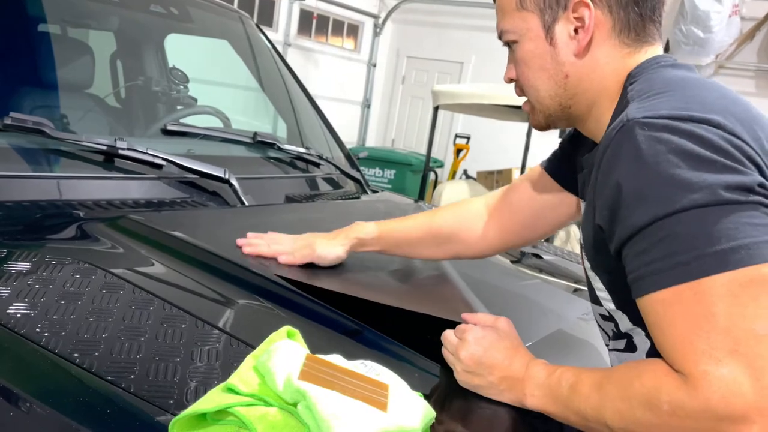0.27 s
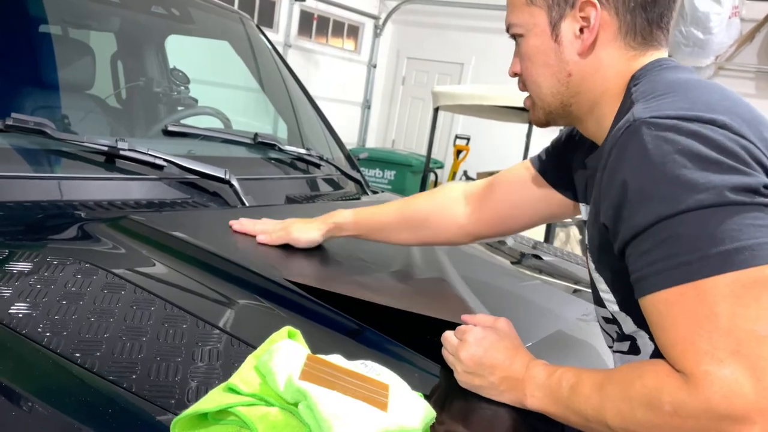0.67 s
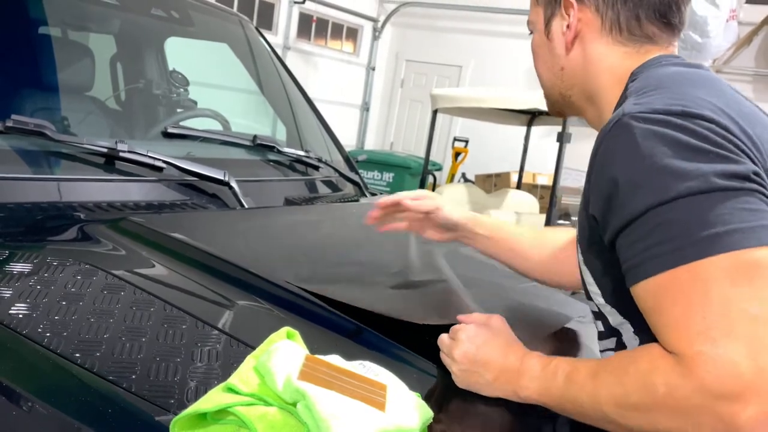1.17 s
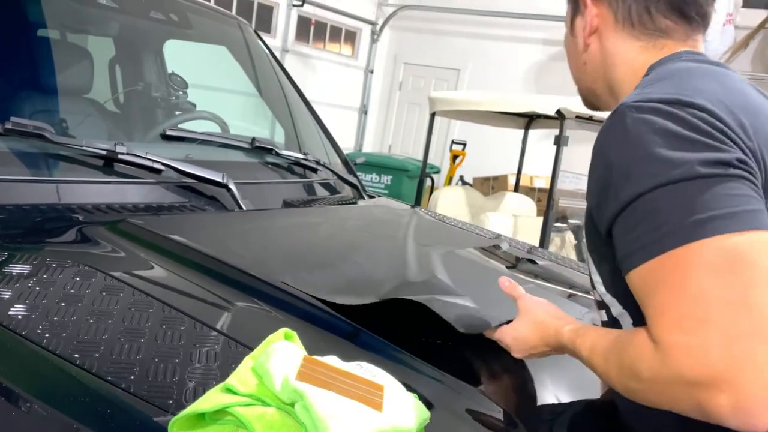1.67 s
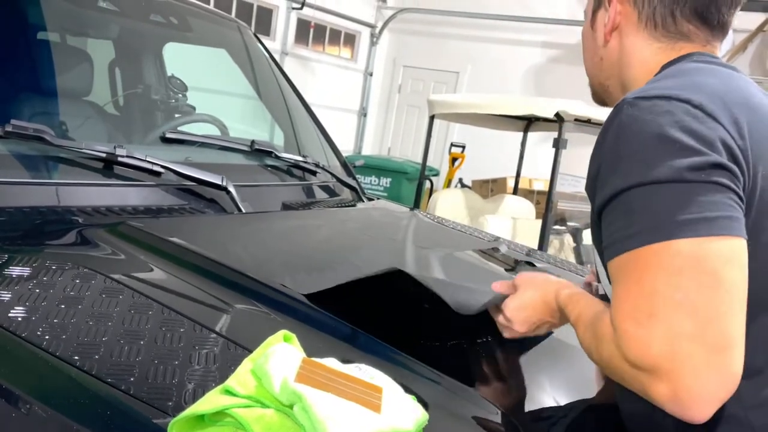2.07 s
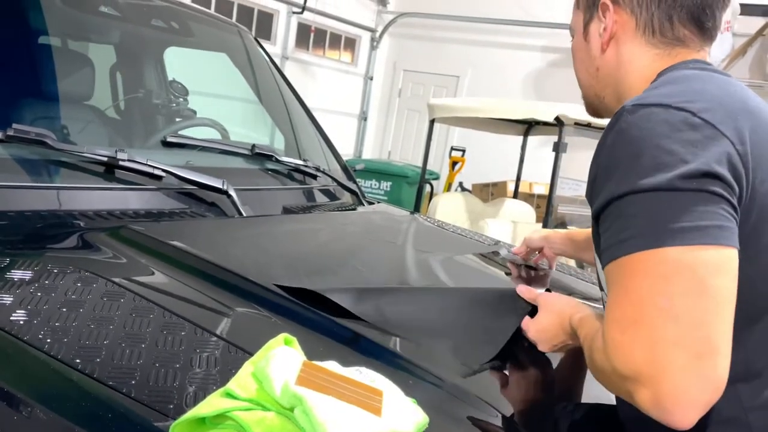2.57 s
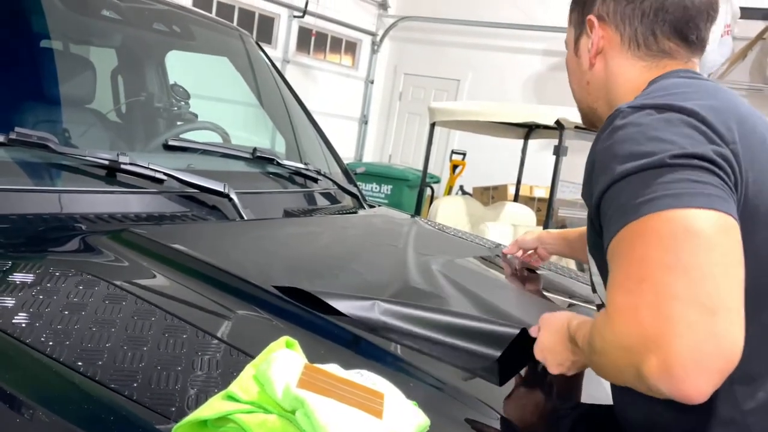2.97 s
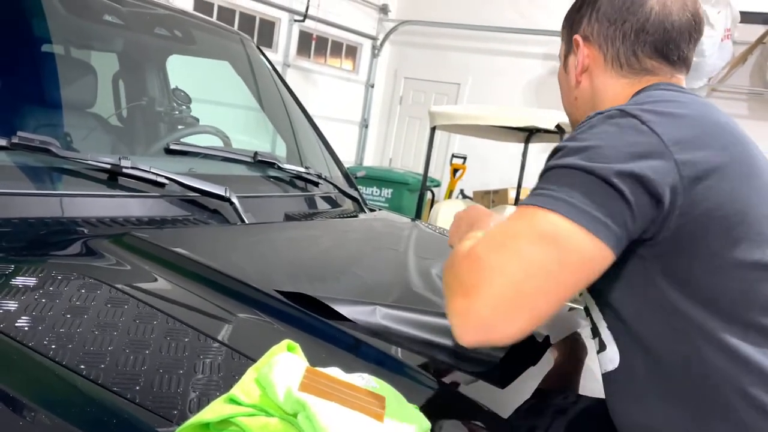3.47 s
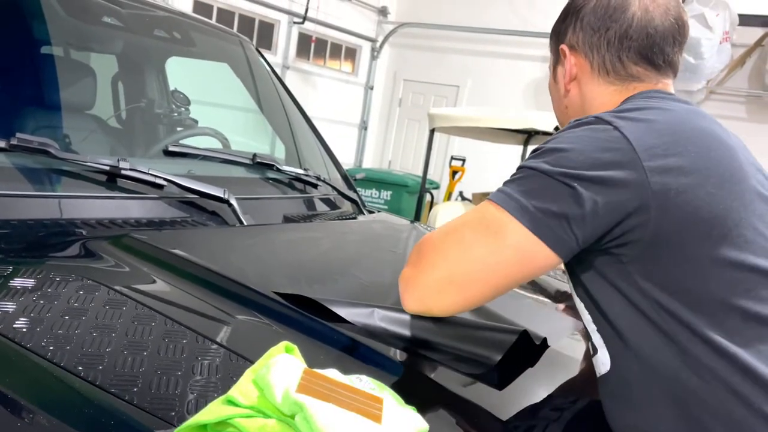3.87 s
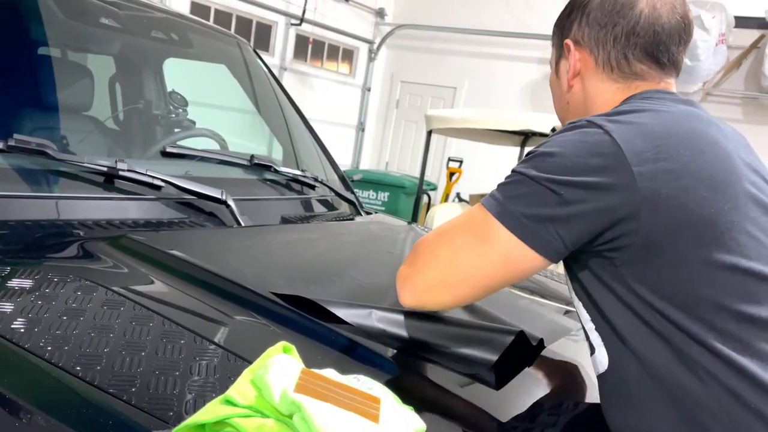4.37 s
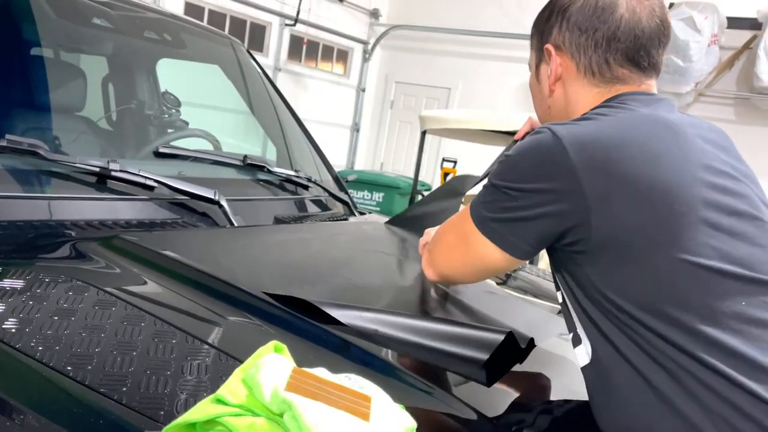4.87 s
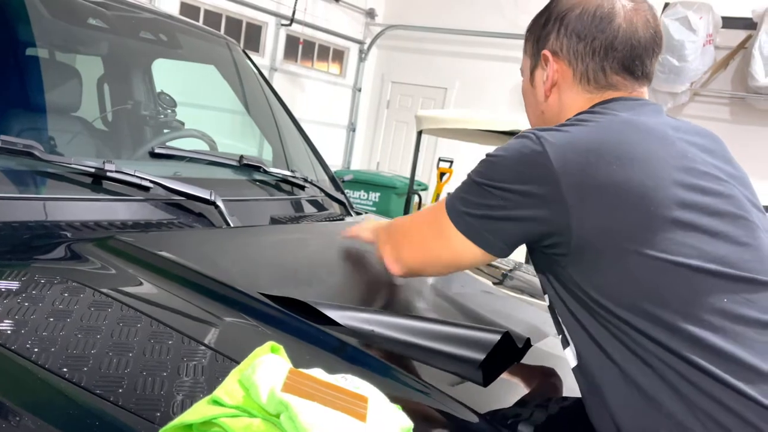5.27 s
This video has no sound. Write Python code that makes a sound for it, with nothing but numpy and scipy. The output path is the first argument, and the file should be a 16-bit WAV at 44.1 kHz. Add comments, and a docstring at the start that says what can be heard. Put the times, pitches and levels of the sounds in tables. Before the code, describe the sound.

A quiet garage with a very faint low hush, heard close up in stereo leaning slightly left. At 0 s a palm settles on the film-covered hood with a soft hollow thump, then strokes with a light airy hiss and grainy drag until about 0.4 s. A stronger low thump at 0.6 s starts a second stroke, ending near 1 s. Faint rustles and dull flaps follow from 1.1 s. From 1.7 s creases tick and snap, building to a dense, loud crackling burst at 2.0-2.1 s. A softer flap comes at 2.35 s, then snaps and a papery flap at 2.7-2.9 s. Sharp snaps cluster at 3.05-3.25 s. Thinner, hollowed crackles appear around 3.6-3.8 s, growing to bright snaps and rustling at 4.05-4.4 s. Two short crackles come at 4.6-4.7 s, then near quiet. At 5.3 s a faint thump leads into a final smooth hissing stroke.

```python
"""A large vinyl sheet is smoothed by a palm over a car hood, then picked up and pulled, in a quiet garage.
The film is filtered noise: single creases snap, runs of tiny buckles crackle, slack folds flap dully.
The palm lands with a hollow thump, decaying sine modes over a padded thud, and hisses as shaped noise.
Snaps, runs, flaps and strokes ring on in a diffuse noise tail; a soft hush lies under everything.
From 3.15 to 4.3 s a hollow glides through the snaps and crackles, thinning what lies below its edge."""
import sys
import numpy as np
from scipy import signal
from scipy.fft import rfft, irfft, next_fast_len
from scipy.io import wavfile
from scipy.ndimage import map_coordinates

SR = 44100
rng = np.random.default_rng(int(sys.argv[2]) if len(sys.argv) > 2 else 0)


def output_pcm(signal):
    """Save a mono or channel-first signal as 16-bit PCM at the path in sys.argv[1].

    Samples are clipped to [-1, 1] before scaling.
    """
    pcm = np.clip(np.atleast_2d(signal).T, -1, 1) * 32767
    wavfile.write(sys.argv[1], SR, np.round(pcm).astype(np.int16))


N = 243873


def amp(db):
    """Logarithmic level: decibels become a linear gain."""
    return 10 ** (np.asarray(db) / 20)


def unit(x):
    """Power normalisation: scale to rms 1."""
    return x / np.sqrt(np.mean(x ** 2) + 1e-20)


def along(points, hz):
    """Logarithmic pitch scale: interpolate (Hz, value) points on a log frequency axis."""
    f, v = np.transpose(points)
    return np.interp(np.log(hz + 1), np.log(f + 1), v)


def wobble(rate, size):
    """Band-limited randomness: a smooth random curve with rate knots a second."""
    knots = rng.standard_normal(int(size * rate / SR) + 4)
    return map_coordinates(knots, [np.arange(size) * rate / SR])


def noise(size):
    """White noise: two unrelated channels with equal power at all frequencies."""
    return rng.standard_normal((2, size))


def add(track, s, x):
    """Superposition: mix x into the track at s seconds."""
    start = max(round(s * SR), 0)
    track[:, start:start + x.shape[1]] += x[:, :max(N - start, 0)]


def coloured(x, level_db, size=2048):
    """Minimum-phase filtering: causal, shaped by level_db(Hz); white noise keeps its power."""
    gain = unit(amp(level_db(np.fft.rfftfreq(size, 1 / SR))))
    cepstrum = irfft(np.log(gain + 1e-6))
    # folding the cepstrum onto positive times makes the filter causal
    cepstrum[1:size // 2] *= 2
    cepstrum[size // 2 + 1:] = 0
    impulse = irfft(np.exp(rfft(cepstrum)))
    return signal.fftconvolve(x, impulse[None], axes=1)


def paired(pair, likeness):
    """Interaural coherence: blend two unrelated signals to a given left-right likeness by frequency."""
    size = next_fast_len(pair.shape[1] + 512)
    hz = np.fft.rfftfreq(size, 1 / SR)
    turn = np.arccos(np.clip(along(likeness, hz), -1, 1)) / 2
    mid, side = irfft(rfft(pair, size) * [np.cos(turn), np.sin(turn)], size)[:, :pair.shape[1]]
    return np.array([mid + side, mid - side])


# Colour of the walls' reflections. Each row: frequency in Hz, relative level in dB.
WALL_COLOUR = [(60, 16.5), (200, 1.5), (700, 3), (2000, 0.5), (6500, 2), (8000, 0), (11000, -7.5),
               (12500, -9), (14000, -24)]
# Reverberation of the garage. Each row: frequency in Hz, time to fall 60 dB in seconds.
GARAGE_T60 = [(100, 0.5), (400, 0.78), (1000, 0.78), (2800, 0.79), (5000, 0.75), (7500, 0.59),
              (11000, 0.49), (15000, 0.31)]
# Coherence of near sounds. Each row: frequency in Hz, left-right likeness (0 to 1).
NEAR_LIKENESS = [(100, 0.96), (600, 0.96), (1500, 1), (3000, 0.53), (6000, 0.92), (8000, 0.95)]
# Coherence of the diffuse field. Each row: frequency in Hz, left-right likeness (0 to 1).
DIFFUSE_LIKENESS = [(100, 0.97), (300, 0.49), (600, 0.0061), (1200, 0)]


def in_garage(x, room_db, build=0.0012):
    """Reverberation: a near sound and the diffuse tail that builds up behind it; highest treble dies first."""
    hz, t, z = signal.stft(noise(SR * 3 // 4), SR, nperseg=256)
    decay_db = -60 * t / along(GARAGE_T60, hz)[:, None]
    fade = amp(decay_db + along(WALL_COLOUR, hz)[:, None]) * (1 - np.exp(-t / build))
    tail = signal.istft(z * fade, SR, nperseg=256)[1]
    tail /= np.linalg.norm(tail[0])
    out = amp(room_db) * paired(signal.fftconvolve(x, tail, axes=1), DIFFUSE_LIKENESS)
    out[:, :x.shape[1]] += paired(x, NEAR_LIKENESS)
    return out


# Landings of the hand. Each row: start in seconds, level in dB, rise time in seconds.
LANDINGS = [(0, -50.5, 0.002), (.578, -42, 0.022), (5.325, -58, 0.012)]
# Modes of the hood. Each row: frequency in Hz, level in dB before the softening by a slow landing,
# time to fall 60 dB in seconds before the palm's damping.
HOOD_MODES = [(77.7, 3.5, 0.69), (112.2, 2, 0.61), (142.4, -20, 0.33), (184.4, -8, 0.36), (230, -20, 1),
              (281, -22, 0.48), (332.4, -11.5, 0.55), (460, -19.5, 0.96)]
# Spectrum of the padded thud. Each row: frequency in Hz, relative level in dB.
THUD_SPECTRUM = [(25, -32), (60, 8), (150, 2), (400, -13.5), (900, -25.5), (4000, -29), (12000, -51)]


def thumps(pad_db=-3, pad_t60=0.94):
    """Modal excitation: the soft hand sets the hood's low panel modes ringing, over a padded thud."""
    track, t = np.zeros((2, N)), np.arange(SR * 3 // 4) / SR
    # as the palm settles it damps the panel
    settle = amp(-20 * (t / 0.35) ** 2)
    for s, db, rise in LANDINGS:
        ring = np.zeros(len(t))
        for hz, level, t60 in HOOD_MODES:
            # a slower landing leaves the upper modes quieter
            strength = amp(level - 60 * t / t60) / np.hypot(1, hz * rise / 6)
            phase = 2 * np.pi * (hz * t + rng.random()) + 0.5 * wobble(31.6, len(t))
            ring += strength * np.sin(phase)
        thud = coloured(noise(len(t)), lambda hz: along(THUD_SPECTRUM, hz))[:, :len(t)]
        thud = amp(pad_db - 60 * t / pad_t60) * paired(thud, NEAR_LIKENESS)
        landing = amp(db) * np.minimum(t / rise, 1) ** 2 * settle
        add(track, s, landing * (ring + thud))
    return track


# Spectrum of the hush. Each row: frequency in Hz, relative level in dB.
HUSH_SPECTRUM = [(20, -16.5), (50, -4.5), (85, -5.5), (150, -12), (400, -14.5), (1000, -18), (3000, -37),
                 (8000, -27.5), (12000, -27.5), (14000, -60.5)]


def still_air(level_db=-76):
    """Diffuse background noise: the steady low hush of the garage."""
    hush = coloured(noise(N), lambda hz: along(HUSH_SPECTRUM, hz))[:, :N]
    return amp(level_db) * unit(paired(hush, DIFFUSE_LIKENESS))


# Strokes of the palm. Each row: start in seconds, length in seconds, hiss level and drag level in dB
# before their common gains, moment of hardest pressure in seconds.
PALM_STROKES = [(0.064, .33, -47, -55.5, 0.3), (0.624, 0.36, -48.5, -59.5, 0.7),
                (1.075, 0.19, -74, -73, 1.19), (5.393, 0.2, -46.5, -71.5, 5.55)]
# Spectrum of the light hiss. Each row: frequency in Hz, relative level in dB.
HISS_SPECTRUM = [(60, -53), (750, -28), (1500, -12), (3000, -7), (6500, -8.5), (8500, -4.5), (9800, 1.5),
                 (11300, 5.5), (12300, -4), (14000, -12), (15800, -7)]
# Spectrum of the heavy drag. Each row: frequency in Hz, relative level in dB.
DRAG_SPECTRUM = [(60, -14), (400, -15), (750, -14), (1400, 0.5), (2200, -5), (4000, -11), (8000, -12),
                 (15000, -46)]
SPEED_POWER = 1.11  # hiss amplitude grows as this power of hand speed
PRESS_S = 0.073  # time in which the pressure changes by a factor e


def glide(hiss_db=-1, drag_db=-3.5, grain_db=1.37, grain_rate=160, room_db=-5):
    """Sliding friction: hiss follows the palm's speed; a lower, grainy rub follows its pressure too."""
    track = np.zeros((2, N))
    for s, length, light_db, heavy_db, pressed_s in PALM_STROKES:
        t = np.arange(int(length * SR)) / SR
        speed = np.sin(np.pi * t / length)
        pressure = np.exp(-np.abs(s + t - pressed_s) / PRESS_S)
        grain = grain_db * wobble(grain_rate, len(t))
        hiss_gain = speed ** SPEED_POWER * amp(light_db + hiss_db + grain / 2)
        drag_gain = np.sqrt(speed) * pressure * amp(heavy_db + drag_db + grain * 2)
        hiss = coloured(hiss_gain * noise(len(t)), lambda hz: along(HISS_SPECTRUM, hz))
        drag = coloured(drag_gain * noise(len(t)), lambda hz: along(DRAG_SPECTRUM, hz))
        add(track, s, in_garage(hiss + drag, room_db))
    return track


# Spectrum of the film. Each row: frequency in Hz, relative level in dB before bumps, slope and ring.
FILM_SPECTRUM = [(40, -34), (150, -14), (500, -13.5), (1000, -5.5), (1550, -2.5), (2000, -0.5), (2700, 0),
                 (4000, -1.5), (6000, -1), (7500, -5), (9500, 0), (11200, 6), (12500, -6.5), (14000, -25),
                 (16000, -35.5)]


def film(drive, treble_db, ring_hz, ring_db, ring_octaves=0.28, uneven_db=4.0, tilt=1.26):
    """Resonant radiation: the drive takes on a broad resonance and random bumps; slack creases are duller."""
    bumps = np.column_stack([np.geomspace(500, 14000, num=24), uneven_db * rng.standard_normal(24)])

    def voice_db(hz):
        slope = tilt * (treble_db + 6.0) * np.clip(np.log2(hz / 2000 + 1e-3) / 2, 0, 1.3)
        ring = ring_db * np.exp(-(np.log2((hz + 1) / ring_hz) / ring_octaves) ** 2)
        return along(FILM_SPECTRUM, hz) + along(bumps, hz) + slope + ring

    return coloured(drive, voice_db)


# Runs of buckling film. Each row: start in seconds, length in seconds, level at the louder end in dB,
# growth over the run in dB, treble balance in dB before the film's tilt, tail level in dB re the near sound.
BUCKLING_RUNS = [(1.11, .105, -58.5, 20, -29.5, -8), (1.641, 0.12, -54.5, 14, -13.5, -4),
                 (1.991, 0.08, -26.5, 21, -9, 1), (2.067, 0.014, -16.5, 2.5, -6, -11),
                 (2.0958, 0.011, -15, 0.5, -10, -18), (2.697, 0.014, -45, 13.5, -5, 2.5),
                 (3.055, 0.035, -52, -2, -5, 2.5), (3.187, .013, -29.5, -10, -9, -11),
                 (3.577, 0.036, -46.5, -6.5, -3, 9), (3.716, 0.087, -32.5, -27.5, -7, 4),
                 (3.991, .045, -52.5, 6, -8, 10), (4.038, 0.028, -37.5, -2, -7, 4.5),
                 (4.107, .054, -27.5, 0.5, -3, 3), (4.244, 0.059, -29, 1.5, -4, 6.5),
                 (4.304, .105, -24.5, -5, -3, 2.5), (4.585, 0.021, -23.5, -1.5, -5.5, 2.5),
                 (4.6791, 0.018, -19.5, -0.5, -4.5, -3)]
BUCKLE_HZ, BUCKLE_DB_PER_OCTAVE = 3770, 12  # resonance at 0 dB treble; an octave lower per 12 dB of loss


def crumples(clump_db=3.5, clump_rate=420, grit_db=2.5, ring_db=3.5, surge_db=1.5, surge_rate=110):
    """Cascading instability: tiny buckles crackle in dense, uneven clumps as a run grows or dies."""
    track = np.zeros((2, N))
    for s, length, db, growth_db, treble_db, room_db in BUCKLING_RUNS:
        size = int(length * SR)
        strain_db = clump_db * wobble(clump_rate, size) + grit_db * wobble(4000, size)
        # a buckle can hold only so much strain before it gives
        clumps = amp(np.minimum(strain_db, 6))
        run = unit(signal.windows.tukey(size, 0.12) * clumps * noise(size))
        surges = unit(amp(surge_db * wobble(surge_rate, size)))
        pull = surges * amp(np.linspace(0, growth_db, size) - max(growth_db, 0))
        ring_hz = BUCKLE_HZ * 2 ** (treble_db / BUCKLE_DB_PER_OCTAVE)
        crackle = film(pull * run, treble_db, ring_hz, ring_db)
        add(track, s, amp(db) * in_garage(crackle, room_db))
    return track


# Flaps of the slack sheet; the last row is the palm pressing air out from under the sheet. Each row: start in
# seconds, level in dB, centre frequency in Hz.
FOLD_FLAPS = [(1.205, -59, 165), (1.347, -62, 410), (1.66, -52.5, 165), (1.776, -47.5, 440),
              (1.898, -55, 234), (2.03, -40.5, 336), (2.071, -41.5, 263), (2.098, -41.5, 392),
              (2.343, -41, 720), (2.433, -48.5, 277), (2.9, -36.5, 800), (2.903, -42.5, 344),
              (3.42, -66, 150), (3.718, -49, 388), (3.735, -53, 187), (4.125, -47.5, 367),
              (4.25, -43.5, 283), (4.341, -47.5, 113), (4.69, -47.5, 202), (5.344, -45.5, 116)]
FLAP_CYCLES = 7.3  # swings in which a flap's drive falls by a factor e, so low folds last longer


def flaps(rise=0.00023, upper_skirt_db=10, lower_skirt_db=4, room_db=-8):
    """Volume displacement: a broad fold swings through, or the palm presses down, and pushes a dull puff of
    air."""
    track, t = np.zeros((2, N)), np.arange(SR // 6) / SR
    for s, db, centre_hz in FOLD_FLAPS:
        shape = (1 - np.exp(-t / rise)) * np.exp(-t * centre_hz / FLAP_CYCLES)

        def band_db(hz):
            skirt_db = np.where(hz > centre_hz, upper_skirt_db, lower_skirt_db)
            return np.maximum(-skirt_db * np.log2((hz + 1) / centre_hz) ** 2, -70)

        puff = coloured(shape * noise(len(t)), band_db)
        puff *= np.linalg.norm(shape) / shape.max() / np.linalg.norm(puff[0])
        add(track, s, amp(db) * in_garage(puff, room_db))
    return track


# Single creases snapping. Each row: start in seconds, level in dB before the common gain,
# treble balance in dB before the film's tilt.
CREASE_SNAPS = [(1.348, -42.5, -17.5), (1.415, -49, -19), (1.603, -44, -33), (1.699, -28, 2.5),
                (1.713, -32, -18), (1.725, -21, 8.5), (1.776, -29.5, -36), (1.792, -26.5, -39),
                (1.860, -28.5, -6.5), (1.886, -33.5, -12), (1.959, -27.5, -14.5), (1.984, -17, 4),
                (2.020, -17.5, -1), (2.042, -19, 1), (2.098, -7.5, -5.5), (2.102, -12.5, -7),
                (2.112, -11, -4.5), (2.345, -29, -15.5), (2.705, -17.5, -9.5), (2.714, -25.5, -25.5),
                (3.057, -22, 4.5), (3.073, -21, 2), (3.120, -17.5, -4.5), (3.189, -13, -2),
                (3.199, -7.5, -4), (3.242, -16.5, -8.5), (3.715, -26, 2), (4.062, -20, -6), (4.239, -13, 5),
                (4.248, -9, -4)]
CREASE_HZ, CREASE_DB_PER_OCTAVE = 2340, 30  # resonance at 0 dB treble; an octave lower per 30 dB of loss
FOLLOW_S, FOLLOW_DB = (0.003, 0.013), -12  # neighbouring crease: range of delay, level re the first


def snaps(level_db=-6, rise=0.00029, life=0.0011, ring_db=4.0, room_db=-3.0):
    """Snap-through buckling: a crease flips over within milliseconds and tips a weaker one beside it."""
    track, t = np.zeros((2, N)), np.arange(SR // 80) / SR
    shape = (1 - np.exp(-t / rise)) * np.exp(-t / life)
    for s, db, treble_db in CREASE_SNAPS:
        ring_hz = CREASE_HZ * 2 ** (treble_db / CREASE_DB_PER_OCTAVE)
        for delay, weaker_db in [(0, 0), (rng.uniform(*FOLLOW_S), FOLLOW_DB)]:
            # so sudden a flip drives all frequencies evenly
            kick = rfft(shape * noise(len(t)))
            burst = irfft(kick / np.abs(kick), len(t)) * np.exp(-(t / life / 4) ** 2)
            burst = unit(burst) * np.sqrt(np.mean(shape ** 2)) / shape.max()
            snap = in_garage(film(burst, treble_db, ring_hz, ring_db), room_db)
            add(track, s + delay, amp(db + weaker_db + level_db) * snap)
    return track


# Path of the hollow. Each row: time in seconds, upper edge in Hz.
HOLLOW_EDGE = [(3.15, 377), (3.3, 887), (3.5, 2150), (3.688, 3170), (3.801, 2230), (3.98, 1160),
               (4.1, 2180), (4.15, 1476), (4.3, 1260)]
HOLLOW_DB, HOLLOW_DIP_DB = 15, 16  # depth below the edge, extra depth just under it
HOLLOW_DIP_OCTAVES = 0.4  # about half the width of the deepest part
HOLLOW_IN_S, HOLLOW_OUT_S = 0.03, 0.23  # fade in, fade out


def hollowed(x):
    """Time-varying filtering: sound thins out under a gliding edge, most deeply just below it."""
    hz, t, z = signal.stft(x, SR, nperseg=1024)
    s, edge_hz = np.transpose(HOLLOW_EDGE)
    octaves = np.log2((hz[:, None] + 1) / np.interp(t, s, edge_hz))
    shelf = (1 - np.tanh(octaves / 0.06)) / 2
    dip = np.exp(-(octaves / HOLLOW_DIP_OCTAVES + 1) ** 4)
    fade = np.clip(np.minimum((t - s[0]) / HOLLOW_IN_S, (s[-1] - t) / HOLLOW_OUT_S), 0, 1)
    cut_db = fade * shelf * (HOLLOW_DB + HOLLOW_DIP_DB * dip)
    return signal.istft(z * amp(-cut_db), SR, nperseg=1024)[1][:, :N]


def scene():
    """Linear superposition: hand, hush and sheet sum in the garage."""
    hand = thumps() + glide()
    creases = hollowed(crumples() + snaps())
    return hand + still_air() + creases + flaps()


# Balance of the microphones. Each row: frequency in Hz, left minus right level in dB.
LEFT_LEAN = [(100, 1.5), (500, 0.5), (1200, 2), (2500, 1.5), (5500, 3.5), (8000, 1), (12000, 1.5)]
TOP_HZ = 16400  # nothing passes above this


def record(dry):
    """Stereo pickup: microphones lean left; the top is nearly one signal, its phase turning between sides."""
    size = next_fast_len(N + SR // 2)
    hz = np.fft.rfftfreq(size, 1 / SR)
    left, right = rfft(dry, size)
    merge = np.interp(hz, [8000, 9400], [0, np.pi / 2 * 0.8])
    turn = np.pi * np.interp(hz, [8600, 11800, 12300, 13300], [0, 2, 2, 3])
    right = (np.cos(merge) * right + np.sin(merge) * left) * np.exp(1j * turn)
    lean = amp(np.outer([0.5, -0.5], along(LEFT_LEAN, hz)))
    low_pass = np.clip((TOP_HZ - hz) / 400, 0, 1)
    return irfft(np.array([left, right]) * lean * low_pass, size)[:, :N]


dry = scene()
out = record(dry)
output_pcm(out)
```